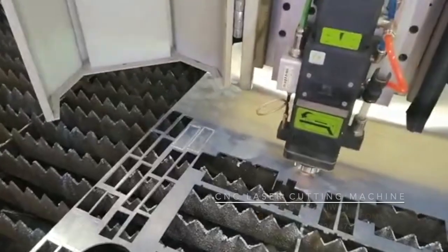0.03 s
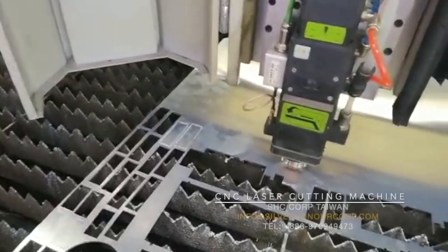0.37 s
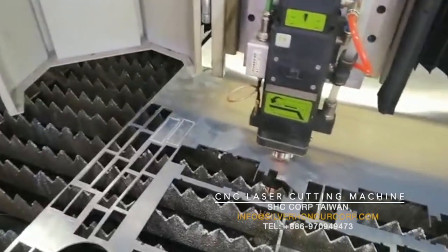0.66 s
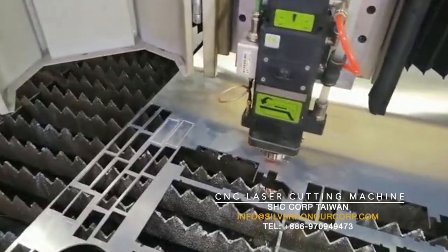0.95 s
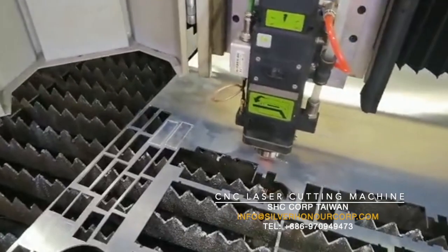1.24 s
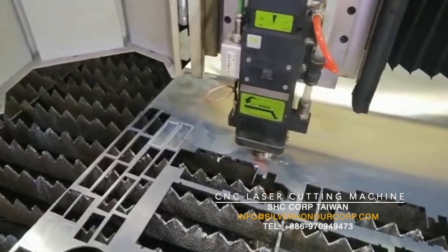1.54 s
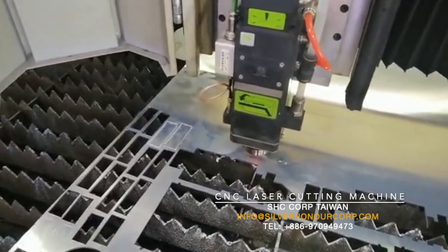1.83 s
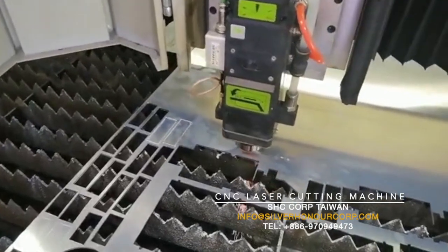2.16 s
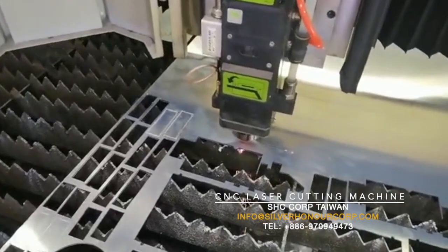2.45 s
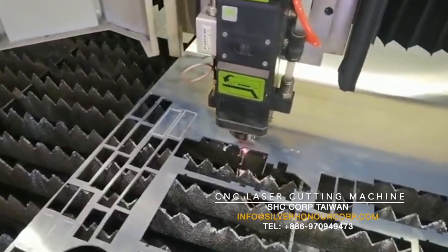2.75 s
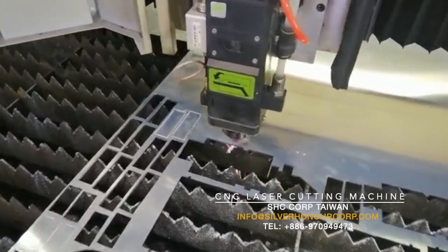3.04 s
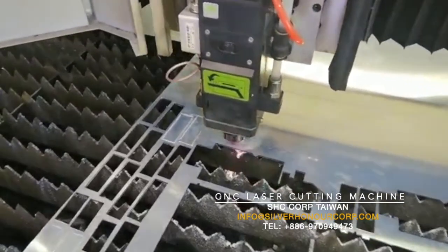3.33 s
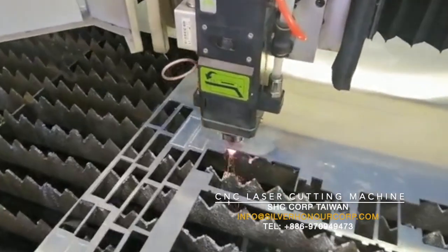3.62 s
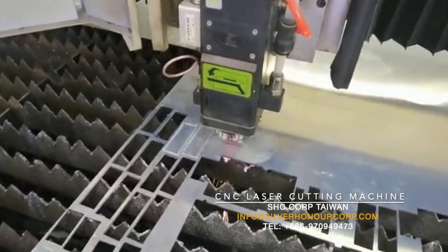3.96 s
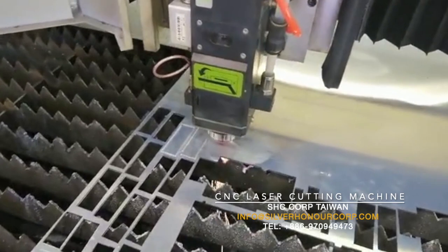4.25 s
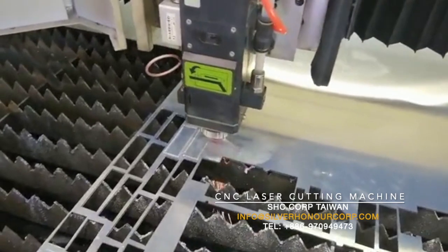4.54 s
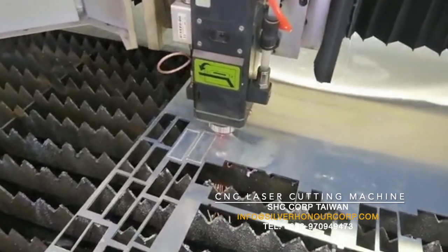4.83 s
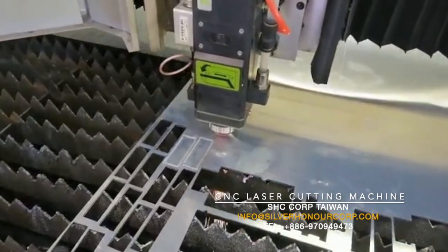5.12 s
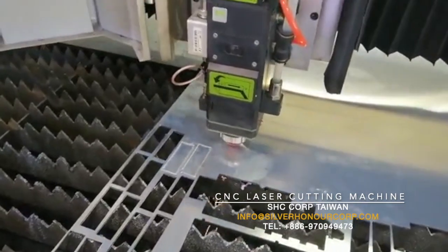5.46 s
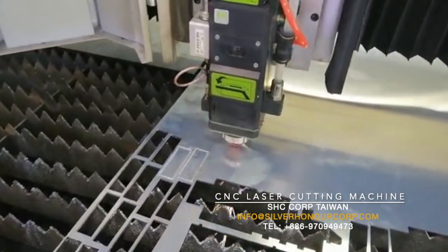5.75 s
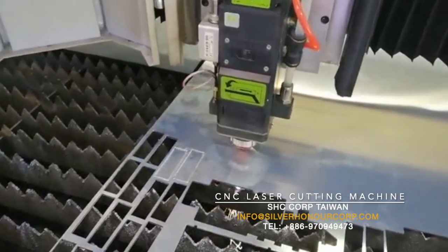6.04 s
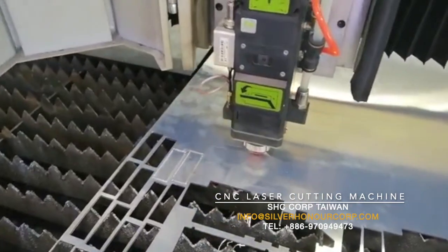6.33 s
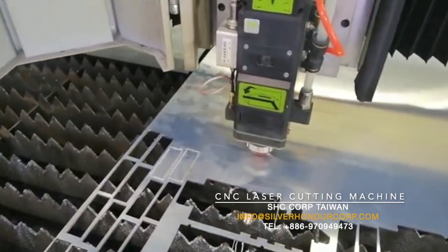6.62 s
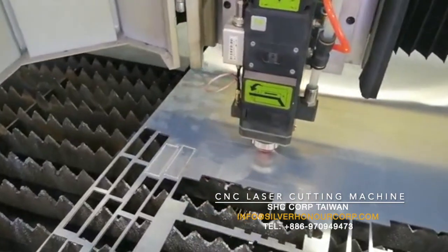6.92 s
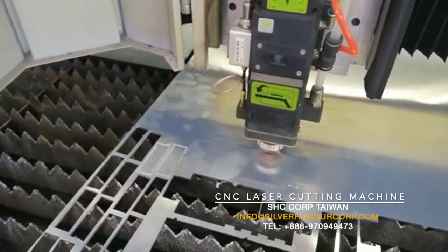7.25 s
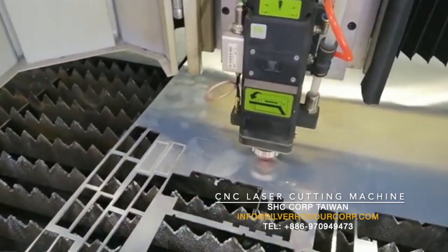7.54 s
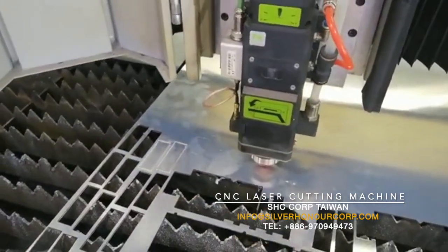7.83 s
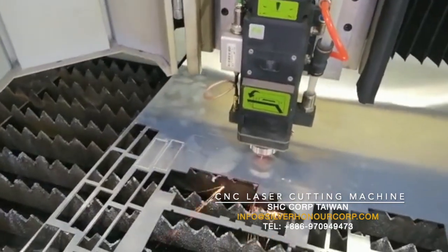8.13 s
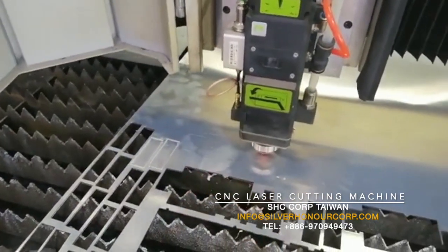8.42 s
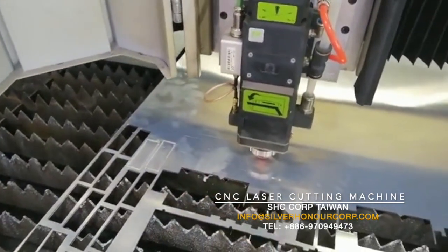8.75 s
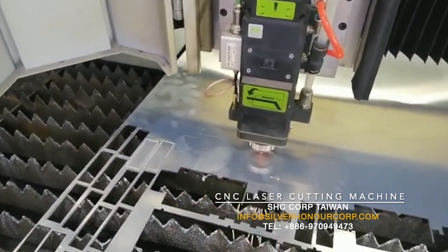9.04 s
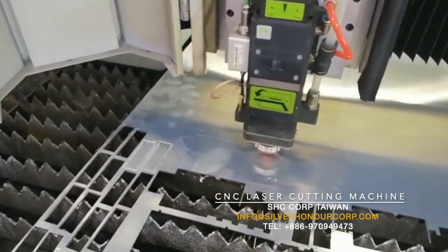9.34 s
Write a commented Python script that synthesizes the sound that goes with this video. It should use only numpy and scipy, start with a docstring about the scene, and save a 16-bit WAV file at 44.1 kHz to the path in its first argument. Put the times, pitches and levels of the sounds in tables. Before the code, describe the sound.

A laser cutter hisses and spits through sheet metal over a factory roar, then abruptly becomes a close, crackling gas jet.

```python
"""A laser cutter on sheet steel, heard close up in a factory hall. The extraction's roar fades in all round.
At about 1 s a valve puffs, then stays open, and assist gas hisses from a nozzle right of the microphone,
with a thin whistle. The gas spits in growing bursts as it blows through the cut; the melt pops throughout.
Near 6 s the sound closes abruptly to the centre, where the open jet rushes, gurgles and crackles with
small, one-sided shock fronts."""
import sys
import numpy as np
from scipy import signal
from scipy.fft import rfft, irfft, next_fast_len
from scipy.io import wavfile
from scipy.ndimage import uniform_filter1d

SR = 44100
rng = np.random.default_rng(int(sys.argv[2]) if len(sys.argv) > 2 else 0)


def to_wav(sig):
    """Store sig (one row per channel, or 1-D mono) as 16-bit WAV at the path in sys.argv[1].

    Samples outside -1..1 are clipped; the rate is SR.
    """
    pcm = np.clip(np.atleast_2d(sig), -1, 1) * 32767
    pcm = np.round(pcm).astype(np.int16)
    wavfile.write(sys.argv[1], SR, pcm.T)  # frames by channels


N = 418068

CUTOFF_HZ = 7600
PUFF_S, PUFF_LENGTH_S, PUFF_DB = 0.927, 0.013, -1.5
VALVE_OPEN_S, VALVE_RAMP_S = 1.035, 0.013
BURST_ATTACK_S, BURST_RELEASE_S = 0.0065, 0.007   # shared by bursts and surges
JET_START_S, JET_FADE_S = 5.83, 0.0082

# Levels are relative within each layer; the functions set the balance.
# Spectrum of the extraction, far off in the hall: frequency_hz, level_db
ROAR_SPECTRUM = [(20, -18), (65, -16), (125, -1.5), (220, -1.5), (350, -2), (480, 0.5), (700, 0.5),
                 (1200, 1), (1800, 0.5), (2300, -0.5), (3000, -11), (5000, -11.5), (7600, -18)]
# The extraction fading in: time_s, level_db
ROAR_LEVELS = [(0,-69),(.35,-59),(.6,-51.5),(1,-47),(2.1,-47),(2.6,-44),(3.7,-40.5),(5,-40),(5.8,-43.5)]
# Spectrum of the gas hiss coming back from the hall: frequency_hz, level_db
WASH_SPECTRUM = [(1700, -29), (1900, -15), (2050, 3.5), (3000, 2), (3950, 3.5), (4250, -14), (6200, -1),
                 (7500, -16)]

# Whistle at the nozzle's lip: time_s, level_db
WHISTLE_LEVELS = [(.74,-85),(.82,-55),(1.05,-62),(1.65,-62),(2.1,-50.5),(3.5,-63),(5.1,-60),(5.4,-46),(5.8,-56.5),(9.48,-54.5)]
# Gas spreading over the sheet: time_s, body_db, sizzle_db, wash_db
SHEET_GAS_LEVELS = [(1.03,-41,-37,-56),(1.3,-38.5,-36.5,-45),(1.65,-42,-39.5,-44.5),(2.24,-44,-37.5,-42),(2.36,-38.5,-35,-40.5),(3.25,-40,-35,-35.5),(3.6,-31.5,-34.5,-37.5),(4.6,-32,-36.5,-40),(5.2,-34.5,-38,-40),(5.8,-40.5,-38,-38)]
# Lower band of the nozzle's hiss: frequency_hz, level_db
BODY_SPECTRUM = [(1700, -33.5), (1900, -5), (2050, 0), (3000, -1.5), (4000, 0), (4700, -17)]
# Upper band of the nozzle's hiss: frequency_hz, level_db
SIZZLE_SPECTRUM = [(3400, -26), (4300, 1), (5000, 2.5), (5600, 1.5), (6250, -7), (6900, 4.5), (7600, -3)]

# Sputter in the cut, building up and falling away: time_s, crackle_db, hiss_db
SPUTTER_LEVELS = [(0,-90,-96),(.5,-70,-74),(1,-58,-67),(1.06,-52.5,-56),(2.2,-51.5,-49.5),(3.4,-46,-47),(4.05,-39,-37.5),(4.95,-39,-36.5),(5.4,-43,-47.5),(5.8,-49,-48)]
# Gas bursting through the melt: start_s, length_s, crackle_db, hiss_db
GAS_BURSTS = [(.045,0.018,-67,-69),(.432,0.017,-63,-63),(.584,.025,-62,-58),(1.459,0.035,-40,-38),(1.683,0.039,-52.5,-38),
              (2.295,0.067,-47.5,-46),(2.522,.02,-42.5,-41),(2.648,.03,-40,-38),(2.835,.06,-43,-48),(2.935,.03,-39,-37),
              (3.09,.025,-36,-34.5),(3.215,0.028,-43,-38),(3.298,.022,-37.5,-43),(3.44,.04,-38.5,-51),(3.544,.055,-35.5,-36.5),
              (3.613,.04,-35,-32.5),(3.72,.03,-35.5,-33.5),(3.799,.03,-43.5,-36.5),(3.865,0.049,-34,-35),(3.998,.1,-32.5,-35.5),
              (4.135,.09,-40.5,-35),(4.292,.14,-35,-39),(4.451,.145,-33.5,-36.5),(4.693,.085,-32,-40.5),(4.864,.08,-34,-39),
              (5.008,0.048,-34.5,-36.5),(5.121,0.063,-40.5,-34.5),(5.255,.025,-37,-39),(5.316,.035,-41.5,-38),(5.455,0.039,-40.5,-35),
              (5.545,0.043,-42.5,-40.5),(5.74,0.031,-45.5,-42)]
# Colour of the cut's crackle: frequency_hz, level_db
SPIT_CRACKLE_SPECTRUM = [(60, -21), (400, -18), (1000, -8.5), (1850, -12), (2100, 6), (2800, 7), (3950, 5),
                         (4400, -1.5), (6000, 1), (7600, -13.5)]
# Spectrum of the cut's rumble: frequency_hz, level_db
SPIT_RUMBLE_SPECTRUM = [(15,-8.5),(50,-12),(150,-13.5),(400,-4),(1000,2.5),(1900,4),(3000,-7.5)]
# Spectrum of the cut's hiss: frequency_hz, level_db
SPIT_HISS_SPECTRUM = [(3300,-8.5),(4300,1.5),(5500,-1.5),(6300,-3.5),(7000,1.5),(7600,-0.5)]
# Resonances of the cut slot: pitch_hz, width_hz, level_db
SLOT_MODES = [(2260,540,-1.5),(2750,680,.5),(3370,640,-0.5),(3810,420,0.5)]
# Where the spurts ring most, sinking as the slot opens up: time_s, pitch_hz
SPURT_CENTRES = [(3.5,3600),(4.5,2700),(5.8,2850)]
# The loudest pops of the melt: start_s, front_db, spatter_db
MELT_POPS = [(.046,-35.5,-56),(.057,-40,-53),(.435,-29.5,-47),(.583,-27,-41),(.615,-32,-51),(.683,-33,-54),(.775,-32,-52),(4.751,-15,-34),(4.774,-18,-37),(5.07,-22,-42),(5.927,-20,-32),
             (6.006,-15,-30),(6.062,-10,-28.5),(6.809,-20,-29),(7.09,-17,-34),(7.502,-14,-27.5),(7.88,-12,-36),(8.425,-16,-32),(8.829,-19,-40),(9.112,-8,-29.5)]
# Spectrum of the spatter after a pop: frequency_hz, level_db
SPATTER_SPECTRUM = [(100,7.5),(350,0.5),(1400,4),(3000,-1),(4500,-19),(7600,-20.5)]

# The open jet, holding nearly steady: time_s, crackle_db, hiss_db
JET_LEVELS = [(5.95,-34,-37.5),(6.15,-37,-39),(6.75,-36.5,-39),(7.45,-35,-38),(8.45,-35,-38),(8.65,-36,-40),(8.95,-35,-37.5),(9.3,-36.5,-39),(9.48,-33.5,-36.5)]
# Brief surges of the jet: start_s, length_s, crackle_change_db, hiss_change_db
JET_SURGES = [(6.475,.025,3.5,.3),(6.556,0.017,0.5,2),(6.96,0.063,2.5,-1.5),(7.07,.03,2,1),(7.3,0.055,1.5,-1),(7.787,.03,1.5,2.5),(7.869,0.0096,5,7),(8.784,0.02,2.5,1),(8.963,0.055,3,1),(9.105,.02,2,2)]
# Colour of the jet's shock fronts: frequency_hz, level_db
SHOCK_SPECTRUM = [(30, -3), (350, 0.5), (700, 1.5), (1500, 1), (3000, 0.5), (4500, -3.5), (6200, -5),
                  (7600, -17)]
# Spectrum of the jet's broad rush: frequency_hz, level_db
RUSH_SPECTRUM = [(15, -8.5), (45, -2), (130, 0.5), (350, -4), (550, -2), (1000, -2.5), (2500, 0.5),
                 (4000, -1), (6000, -24)]
# Spectrum of the jet's fine hiss: frequency_hz, level_db
JET_HISS_SPECTRUM = [(1500, -25), (3000, -11), (4500, 2), (5400, -0.5), (6250, -3), (6900, 4.5), (7600, 4)]
# Resonances of the gurgling melt: pitch_hz, width_hz, level_db
MELT_MODES = [(697, 260, -4), (950, 270, 0), (1340, 330, 1.5), (1830, 390, -1.5), (2540, 450, 2)]


def from_db(db):
    """Decibels to gain."""
    return 10 ** (np.asarray(db) / 20)


def rms_one(x):
    """Scale to unit power."""
    return x / np.sqrt(np.mean(x ** 2) + 1e-20)


def gains(rows):
    """One gain curve for each dB column of a table."""
    times_s, *columns = np.transpose(rows)
    return [from_db(np.interp(np.arange(N) / SR, times_s, db)) for db in columns]


def gate(start_s, length_s, attack_s=BURST_ATTACK_S, release_s=BURST_RELEASE_S):
    """Swell up to the start, hold, die away."""
    t = np.arange(N) / SR - start_s
    log_gain = np.minimum(t / attack_s, 0) - np.maximum(t - length_s, 0) / release_s
    return np.exp(np.maximum(log_gain, -np.log(1e9)))


def drift(rate_hz):
    """A random wander with spread 1, mostly slower than rate_hz."""
    step, settle = 40, 2000
    pole = np.exp(-2 * np.pi * rate_hz * step / SR)
    noise = rng.standard_normal(N // step + settle + 2)
    slow = signal.lfilter([1], [1, -2 * pole, pole * pole], noise)[settle:]
    return np.interp(np.arange(N) / step, np.arange(len(slow)), rms_one(slow))


def coloured(x, spectrum):
    """Give a signal a smooth spectrum that falls away beyond its end points; rms 1."""
    size = next_fast_len(N)
    hz, db = np.transpose(spectrum)
    hz, db = np.r_[hz[0] / 2, hz, hz[-1] * 2], np.r_[db[0] - 40, db, db[-1] - 40]
    bins_hz = np.maximum(np.arange(size // 2 + 1) * SR / size, 1)
    response = from_db(np.interp(np.log(bins_hz), np.log(hz), db)) * (bins_hz < CUTOFF_HZ)
    return rms_one(irfft(rfft(x, size) * response, size)[..., :N])


def turbulence(spectrum, flutter_db, flutter_hz, channels=1):
    """Rushing air whose strength flutters with its eddies; each channel has its own noise."""
    return coloured(rng.standard_normal((channels, N)), spectrum) * from_db(flutter_db * drift(flutter_hz))


def watery(x, depth_db):
    """The recorder's processing leaves a patchy, watery texture: narrow bands sink briefly at random."""
    spectra = signal.stft(x, nperseg=1024)[2]
    chance = uniform_filter1d(rng.standard_normal(spectra.shape[-2:]), size=4, axis=-1)   # along time
    chance = uniform_filter1d(chance, size=3, axis=-2)   # across bands
    dips = np.minimum(rms_one(chance), 0.5)
    return rms_one(signal.istft(spectra * from_db(depth_db * dips))[1][..., :N])


def resonance(pitch_hz, width_hz):
    """Noise ringing in one band; rms 1."""
    edges_hz = np.clip([pitch_hz - width_hz / 2, pitch_hz + width_hz / 2], 20, 0.45 * SR)
    band = signal.butter(2, edges_hz, "band", fs=SR, output="sos")
    return rms_one(signal.sosfilt(band, rng.standard_normal(N)))


def flaring(modes, fast_db, slow_db, centre_hz, spread_hz):
    """A hole that keeps changing shape: each resonance flares on its own, most of all near centre_hz."""
    ringing = 0
    for pitch_hz, width_hz, level_db in modes:
        favoured = np.exp(-0.5 * ((pitch_hz - centre_hz) / spread_hz) ** 2)
        flare = from_db(level_db + fast_db * drift(rate_hz=90) + slow_db * drift(rate_hz=9))
        ringing = ringing + favoured * flare * resonance(pitch_hz, width_hz)
    return rms_one(ringing)


def shock_train(per_s, clump_db, clump_hz):
    """Compression fronts of random height; passing eddies throw them off in clumps."""
    eddies = from_db(clump_db * drift(clump_hz))
    born = rng.random(N) < per_s * eddies / eddies.mean() / SR
    return born * rng.rayleigh(1, N) * eddies ** 0.22


def relax(fronts, corner_hz):
    """Each sharp rise of pressure is followed by a long, shallow suction."""
    return signal.sosfilt(signal.butter(1, corner_hz, "high", fs=SR, output="sos"), fronts)


def hall(wash):
    """From all sides: the extraction's roar, watery from the recorder's processing, and reflected hiss."""
    level, = gains(ROAR_LEVELS)
    roar = watery(turbulence(ROAR_SPECTRUM, flutter_db=0.76, flutter_hz=29, channels=2), depth_db=4)
    reflections = turbulence(WASH_SPECTRUM, flutter_db=0.6, flutter_hz=15, channels=2)
    return level * from_db(2) * roar + wash * from_db(-3) * reflections


def whistle():
    """The lip of the nozzle adds a thin, airy whistle."""
    level, = gains(WHISTLE_LEVELS)
    return level * resonance(pitch_hz=7440, width_hz=200)


def over_sheet(force):
    """Body, sizzle and wash of the gas above the sheet: let in by the valve, drained by the cut."""
    puff = from_db(PUFF_DB) * gate(PUFF_S, PUFF_LENGTH_S, attack_s=0.005, release_s=0.0054)
    valve = puff + gate(VALVE_OPEN_S, N / SR, VALVE_RAMP_S, VALVE_RAMP_S)
    halving_db, steepness = (-37.5, -35, -39), 2.64   # force in the cut that halves each part
    drains = [1 + (force / from_db(db)) ** steepness for db in halving_db]
    return [valve * level / drain for level, drain in zip(gains(SHEET_GAS_LEVELS), drains)]


def nozzle(body, sizzle):
    """Gas fans out over the sheet, off to the right; the recorder's processing makes its hiss watery."""
    lower = body * turbulence(BODY_SPECTRUM, flutter_db=2.5, flutter_hz=25)
    upper = sizzle * turbulence(SIZZLE_SPECTRUM, flutter_db=1.07, flutter_hz=28)
    hiss = lower + upper
    return hiss.std() * watery(hiss, depth_db=6.5) * from_db([[-26], [0]])


def blow_through():
    """Strength of the crackle and of the hiss in the cut: bursts on top of a steady sputter."""
    crackle_power, hiss_power = np.square(gains(SPUTTER_LEVELS))
    for start_s, length_s, crackle_db, hiss_db in GAS_BURSTS:
        burst = gate(start_s, length_s)
        crackle_power += (burst * from_db(crackle_db)) ** 2
        hiss_power += (burst * from_db(hiss_db)) ** 2
    return np.sqrt(crackle_power), np.sqrt(hiss_power)


def spitting(force, hiss_level):
    """Gas breaks through the melt, dead ahead: shock fronts, spurts ringing in the slot, rumble, hiss."""
    centre_hz = np.interp(np.arange(N) / SR, *np.transpose(SPURT_CENTRES))
    fronts = shock_train(per_s=520, clump_db=3.5, clump_hz=60)
    crackle = coloured(relax(fronts, corner_hz=350), SPIT_CRACKLE_SPECTRUM)
    spurts = flaring(SLOT_MODES, fast_db=3, slow_db=0.7, centre_hz=centre_hz, spread_hz=950)
    rumble = turbulence(SPIT_RUMBLE_SPECTRUM, flutter_db=3.5, flutter_hz=15)
    hiss = turbulence(SPIT_HISS_SPECTRUM, flutter_db=1.3, flutter_hz=24)
    spit = from_db(-2) * crackle + from_db(-4.5) * spurts + from_db(-13) * rumble
    return force * spit + hiss_level * from_db(-3) * hiss


def pops():
    """The melt pops: single strong fronts, each trailed by a few milliseconds of spatter."""
    fronts, kicks = np.zeros((2, N))
    for start_s, front_db, spatter_db in MELT_POPS:
        at = round(start_s * SR)
        fronts[at] = from_db(front_db) * SR / (2 * CUTOFF_HZ)   # allows for height lost above the cutoff
        kicks[at] = from_db(spatter_db)
    decay_s, edge_hz = 0.003, 4400
    tails = signal.lfilter([1], [1, -np.exp(-1 / (decay_s * SR))], kicks + 1e-18)
    spatter = tails * coloured(rng.standard_normal(N), SPATTER_SPECTRUM)
    rounded = signal.sosfilt(signal.butter(2, edge_hz, fs=SR, output="sos"), fronts)
    return relax(rounded, corner_hz=500) + spatter


def jet_strength():
    """Crackle and hiss of the open jet waver very slightly together, with a few surges."""
    crackle, hiss = gains(JET_LEVELS) * from_db(0.05 * drift(rate_hz=20))
    for start_s, length_s, crackle_db, hiss_db in JET_SURGES:
        surge = gate(start_s, length_s)
        crackle *= from_db(crackle_db * surge)
        hiss *= from_db(hiss_db * surge)
    return crackle, hiss


def jet():
    """The open jet, close and central: shock fronts stand out of a broad rush, a gurgle and a fine hiss."""
    force, hiss_level = jet_strength()
    fronts = shock_train(per_s=450, clump_db=2.5, clump_hz=75)
    shocks = coloured(relax(fronts, corner_hz=450), SHOCK_SPECTRUM)
    rush = turbulence(RUSH_SPECTRUM, flutter_db=0.5, flutter_hz=40)
    gurgle = flaring(MELT_MODES, fast_db=3, slow_db=3, centre_hz=1400, spread_hz=1800)
    hiss = turbulence(JET_HISS_SPECTRUM, flutter_db=0.83, flutter_hz=35)
    blast = from_db(-0.84) * shocks + from_db(-6) * rush + from_db(-10.5) * gurgle
    return force * blast + hiss_level * from_db(-0.8) * hiss


def scene():
    """The wide sound of hall, nozzle and cut gives way abruptly to the jet in the centre."""
    centred = np.clip((np.arange(N) / SR - JET_START_S) / JET_FADE_S, 0, 1)
    force, hiss_level = blow_through()
    body, sizzle, wash = over_sheet(force)
    lip = whistle()
    wide = hall(wash) + nozzle(body, sizzle) + spitting(force, hiss_level) + lip * from_db([[-4], [2]])
    return np.sqrt(1 - centred) * wide + np.sqrt(centred) * (jet() + lip) + pops()


def record(dry):
    """A narrow-band recorder cuts the top off steeply."""
    lowpass = signal.firwin(801, CUTOFF_HZ, fs=SR, window=("kaiser", 8))
    return signal.fftconvolve(dry, lowpass[None], "same", axes=1)


dry = scene()
out = record(dry)
to_wav(out)
```